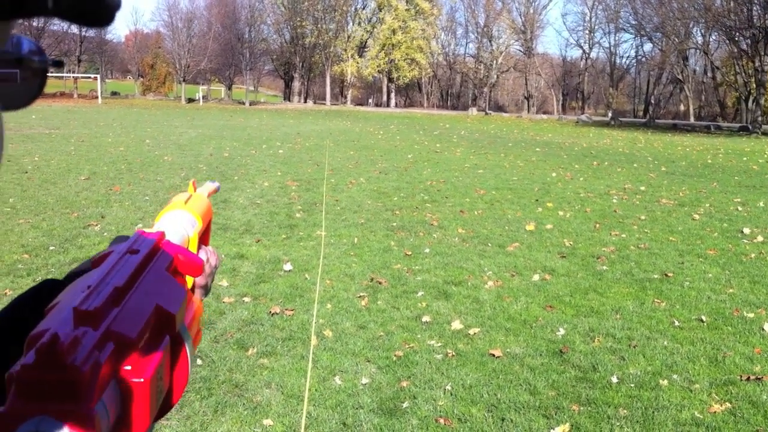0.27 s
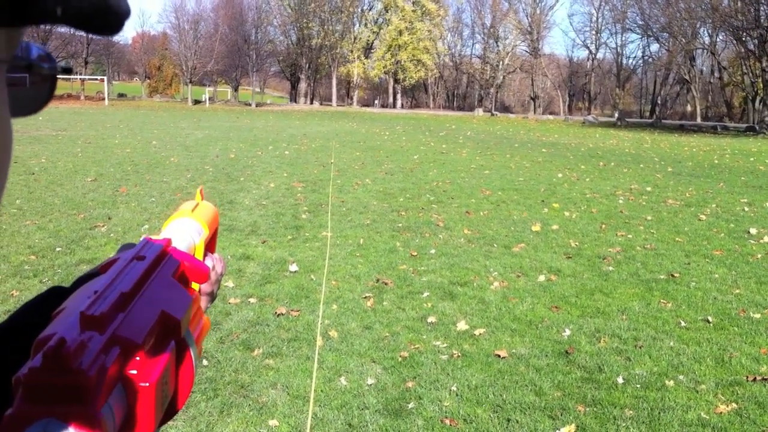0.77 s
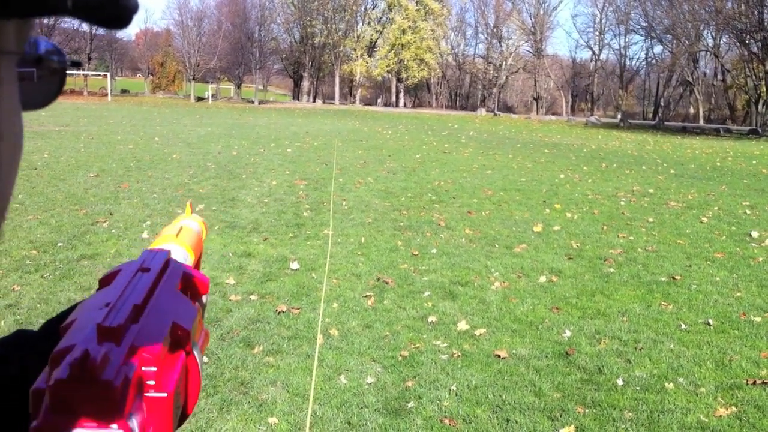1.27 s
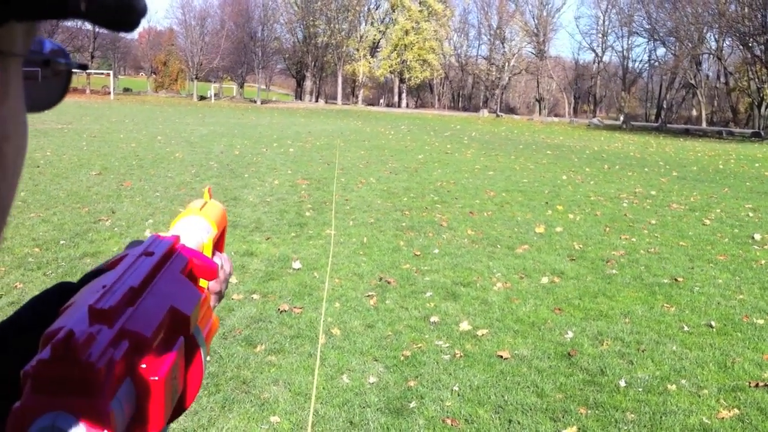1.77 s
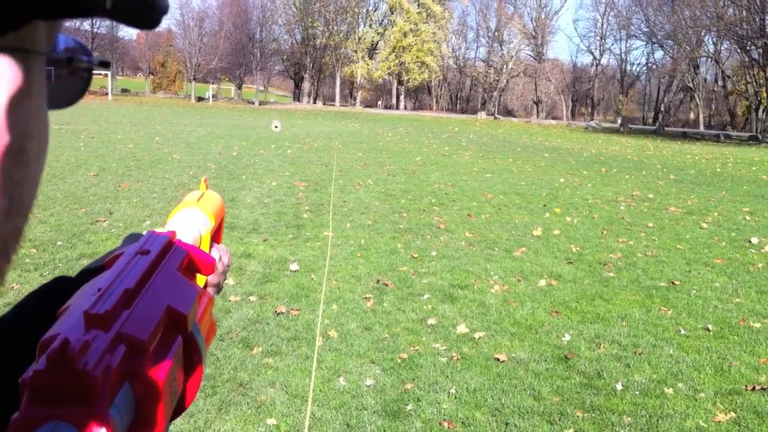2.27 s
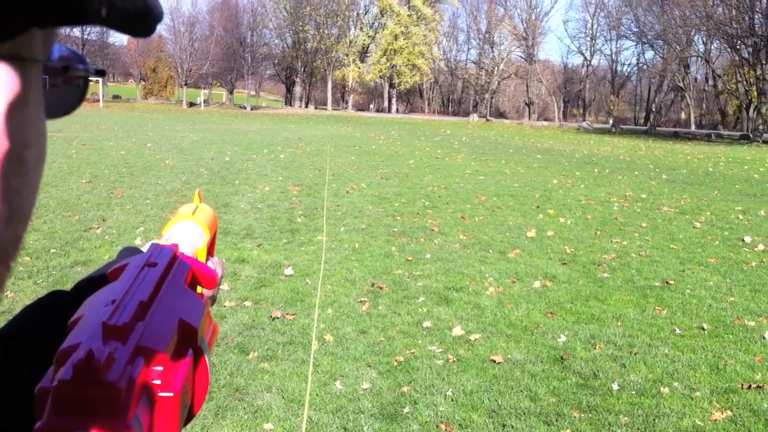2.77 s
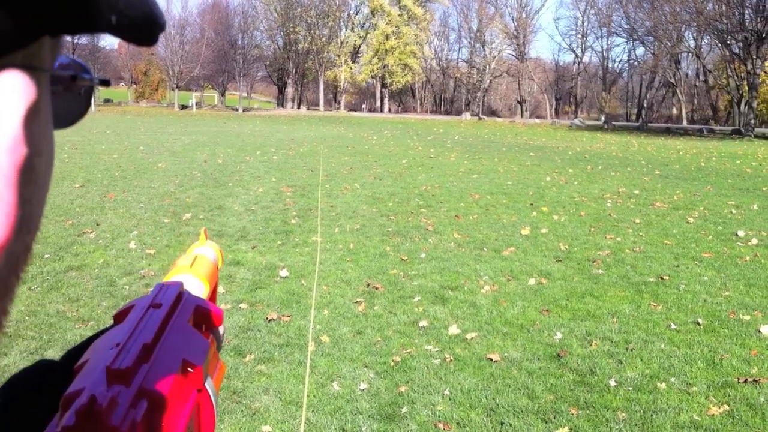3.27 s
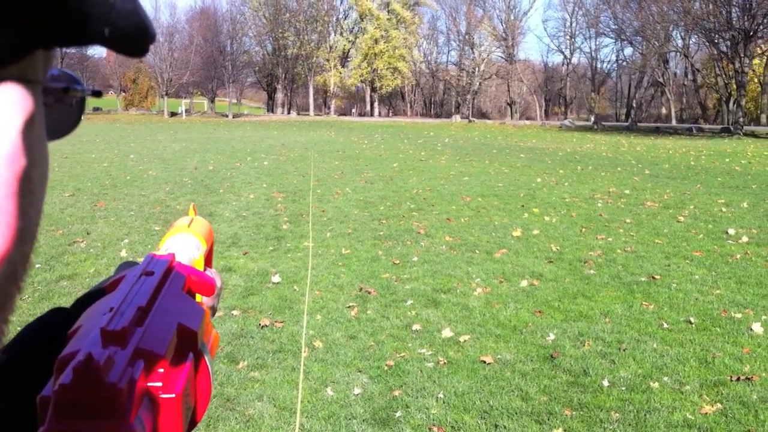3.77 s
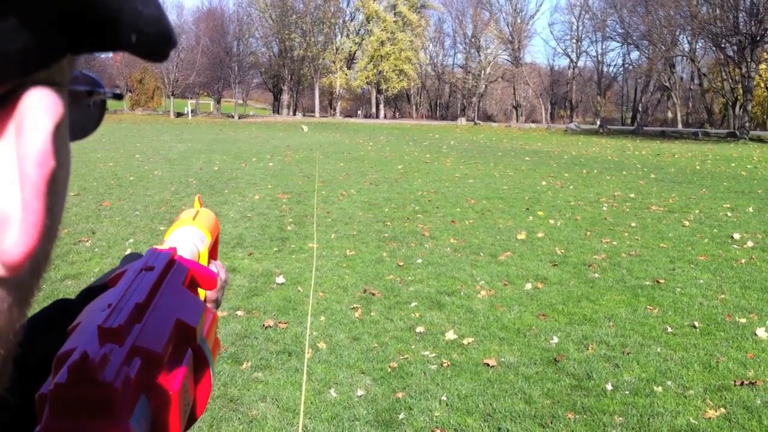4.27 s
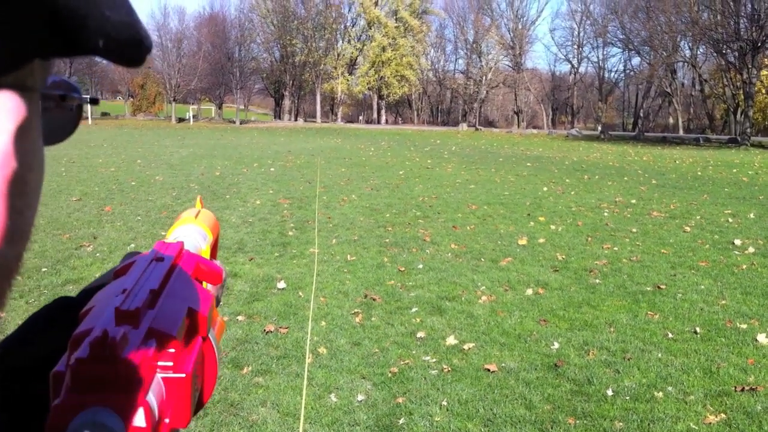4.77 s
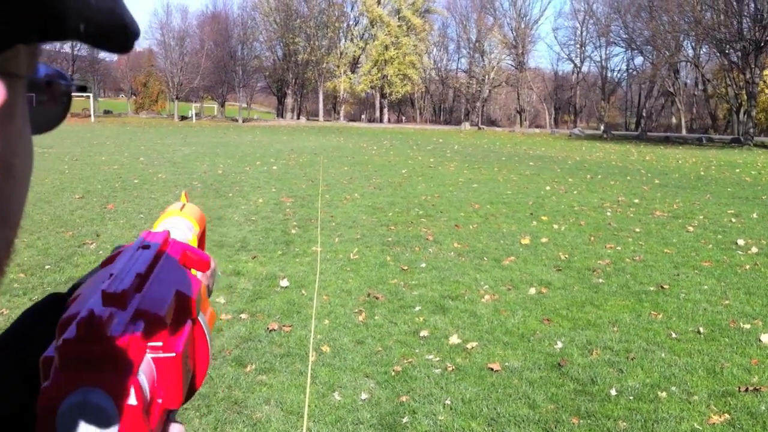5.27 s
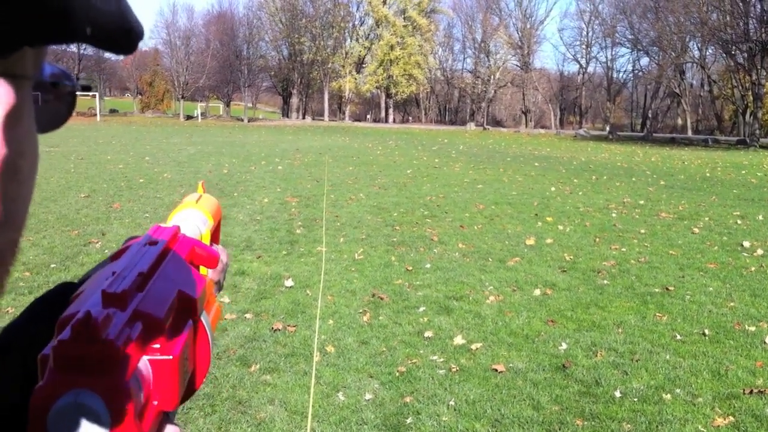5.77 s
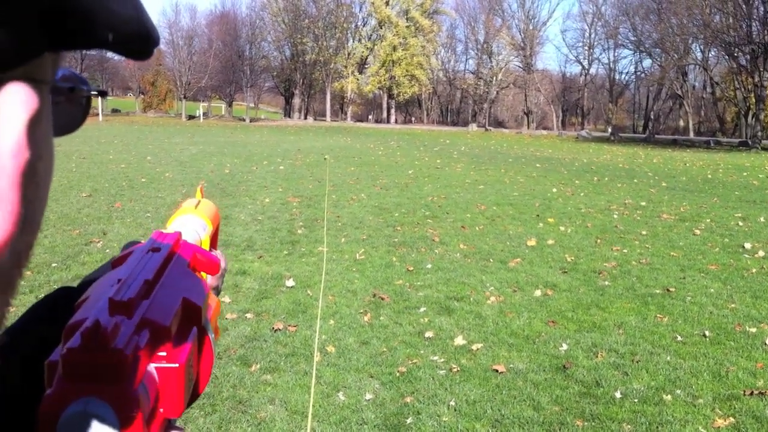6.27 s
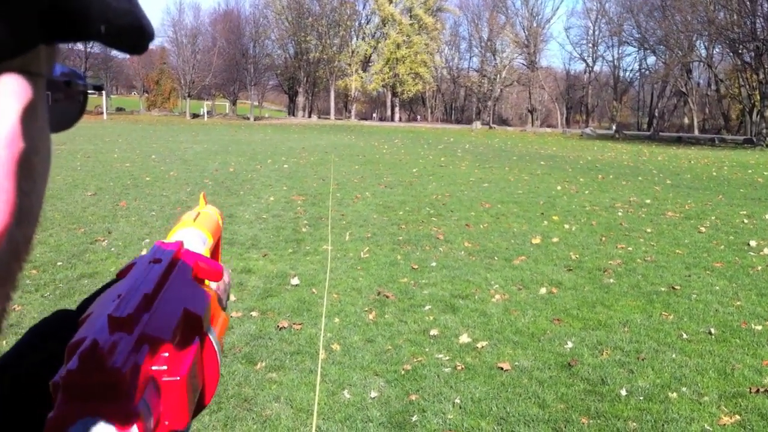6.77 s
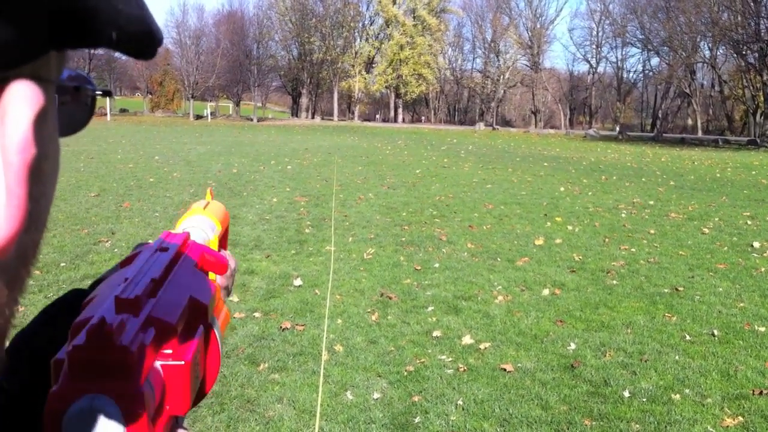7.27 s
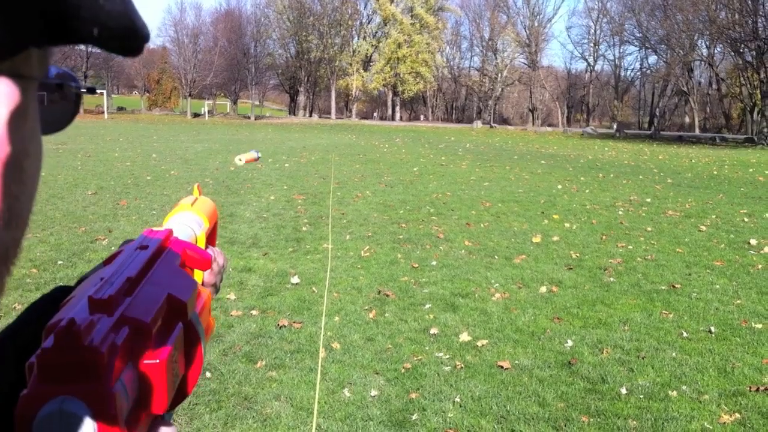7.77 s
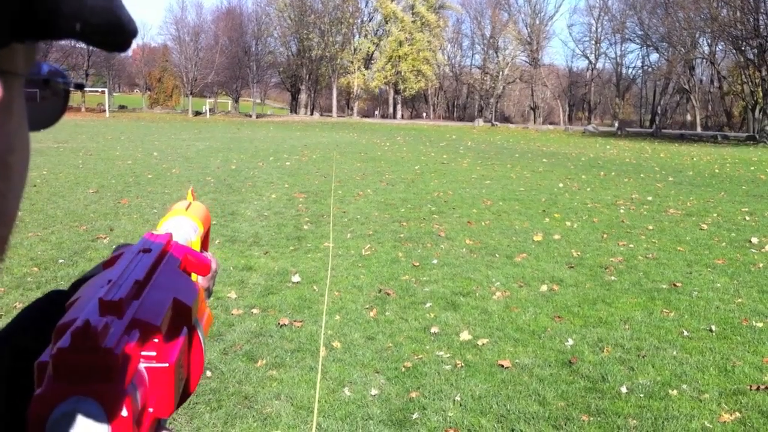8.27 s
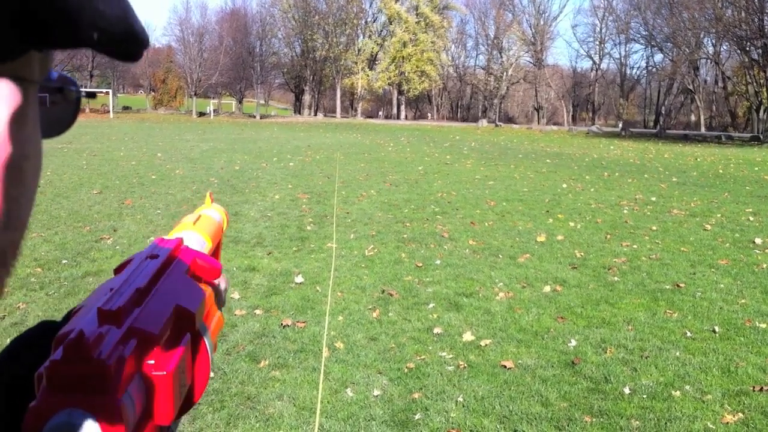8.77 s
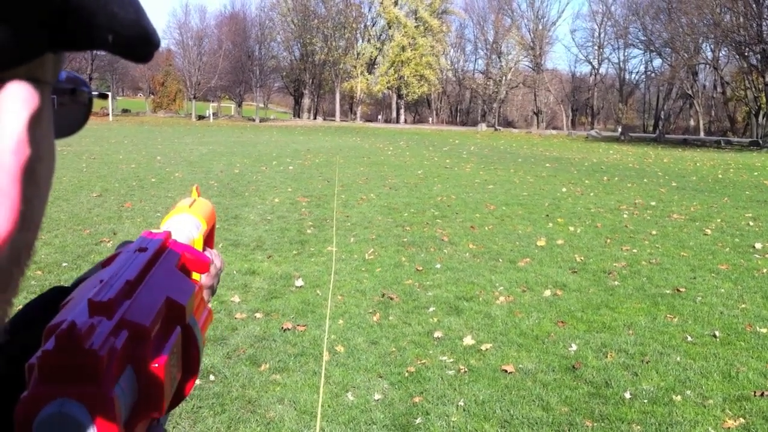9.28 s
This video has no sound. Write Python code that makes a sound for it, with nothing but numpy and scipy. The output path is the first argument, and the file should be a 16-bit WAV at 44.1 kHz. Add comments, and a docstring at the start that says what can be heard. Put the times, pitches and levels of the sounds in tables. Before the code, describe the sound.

Close, dry plastic mechanics outdoors, with almost no echo. A spring blaster fires with a sharp crack and brief airy whistle, its trigger clicks back, the pump is pulled through several rapid clicks to a stop, then pushed forward to a hollow clack with faint springy ringing. The cycle repeats evenly, five shots and five pumps, above a soft far-off road rumble and faint hiss.

```python
"""A low traffic hum and a few breeze puffs are heard first, then a plastic dart blaster is fired and pumped five times.
Each shot is a trigger creak, latch ticks and the plunger's slam; the dart whistles away. The trigger clicks back,
the pump grip ratchets back and slides home. Plastic is impact noise driving shell resonances, the spring rings as
decaying sines and a noisy mode cluster, the whistle is a gliding tone, and air, road and hiss are shaped noise."""
import sys
import numpy as np
from scipy import signal
from scipy.io import wavfile
from scipy.ndimage import map_coordinates

SR = 44100
rng = np.random.default_rng(int(sys.argv[2]) if len(sys.argv) > 2 else 0)


def store_wav(level_fs):
    """Save 16-bit WAV to argv[1]."""
    pcm = np.round(np.clip(np.atleast_2d(level_fs), -1, 1) * 32767)
    wavfile.write(sys.argv[1], SR, pcm.T.astype(np.int16))


N = 420273
TINY = 1e-18   # keeps idle filters away from denormal numbers


def amp(db):
    """Logarithmic level: decibels to a pressure gain."""
    return 10 ** (np.asarray(db) / 20)


def rms_one(x):
    """Normalisation: scale a signal to unit rms."""
    return x / np.sqrt(np.mean(x ** 2) + 1e-20)


def seconds(duration_s):
    """Sampling: the time axis of a short event, in seconds."""
    return np.arange(int(duration_s * SR)) / SR


def add_at(out, s, shape):
    """Superposition: add a short shape to a signal, starting at s seconds."""
    out[int(s * SR):][:shape.size] += shape


def drift(rate):
    """Slow random modulation: smoothly joined random values, rate of them per second; rms 1."""
    steps = rng.standard_normal(int(N / SR * rate) + 3)
    position = np.arange(N) / SR * rate + 1
    return rms_one(map_coordinates(steps, [position], order=3))


def resonate(x, hz, width_hz):
    """Damped resonance: a two-pole mode with gain close to 1 at its peak."""
    r = np.exp(-np.pi * width_hz / SR)
    poles = [1, -2 * r * np.cos(2 * np.pi * hz / SR), r * r]
    return signal.lfilter([(1 - r * r) / 2, 0, (r * r - 1) / 2], poles, x)


def body(x, modes, sway_db=0):
    """Modal superposition: parallel modes of alternating sign, scaled so that steady white noise keeps its rms."""
    click = np.eye(1, 4096)[0]   # put ahead of the sound to learn the energy of the response
    both = 0
    for k, (hz, width_hz, db) in enumerate(modes):
        drive = x * amp(sway_db * drift(40)) if sway_db else x
        both = both + (-1) ** k * amp(db) * resonate(np.r_[click, drive], hz, width_hz)
    return both[click.size:] / np.sqrt(np.sum(both[:click.size] ** 2))


def coloured(spectrum, patchy_db, rate):
    """Spectral shaping: third-octave bands of noise, each flickering on its own; rms 1."""
    hz, level_db = np.transpose(spectrum)
    out, white = 0, rng.standard_normal((2, N))
    octaves = np.log2(min(hz[-1], 17000) / hz[0])
    edges = hz[0] * 2 ** np.arange(0, octaves + .3, 1 / 3)
    for k, (low, high) in enumerate(zip(edges, edges[1:])):
        sos = signal.butter(2, [low, high], "band", fs=SR, output="sos")
        band = signal.sosfilt(sos, white[k % 2])   # neighbouring bands use different noise
        centre_db = np.interp(np.log(low * high) / 2, np.log(hz), level_db)
        out = out + band * amp(centre_db + patchy_db * drift(rate))
    return rms_one(out)


def swell(rows, column):
    """Amplitude envelope: one dB column of short curves as a gain that is zero between them."""
    gain = np.zeros(N)
    for curve in rows:
        s, value = np.transpose(curve)[[0, column]]
        i = np.arange(int(s[0] * SR), int(s[-1] * SR))
        gain[i] = amp(np.interp(i / SR, s, value)) * signal.windows.tukey(i.size, .1)
    return gain


# Spectrum of the microphone hiss. Each row: frequency in Hz, relative density in dB per Hz.
HISS_SPECTRUM = [(1500, -0.5), (4000, 0), (8000, -2.5), (13000, -4), (16000, -2)]


def microphone_hiss():
    """Self-noise: a steady broadband floor at -76 dB rms."""
    return amp(-76) * coloured(HISS_SPECTRUM, patchy_db=.4, rate=14)


# Far road. Each row: time in seconds, rumble in dB, tyre roar in dB, motor note in dB.
TRAFFIC_LEVELS = [(0.0, -48, -56.5, -75), (0.26, -52, -59, -70), (0.5, -55, -58, -65.5),
                  (1.33, -54.5, -58, -71.5), (2.12, -55, -59, -63.5), (2.76, -54.5, -58, -62.5),
                  (3.66, -54.5, -58, -67), (3.74, -55.5, -59, -62.5), (5.23, -57, -57.5, -66.5),
                  (5.57, -57, -59, -74.5), (6.02, -56.5, -58, -73), (6.74, -58, -59.5, -72),
                  (7.09, -57, -58.5, -82), (7.4, -58.5, -59, -75), (7.94, -56, -59.5, -71),
                  (8.09, -57.5, -58.5, -76), (9.0, -57, -57.5, -75.5), (9.53, -57, -58.5, -68)]
# Spectrum of the engine rumble. Each row: frequency in Hz, relative density in dB per Hz.
RUMBLE_SPECTRUM = [(25, -39), (60, -23), (100, -5), (140, -1), (212, 2), (300, -6), (360, -18.5),
                   (500, -27.5)]
# Spectrum of the tyre roar. Each row: frequency in Hz, relative density in dB per Hz.
ROAR_SPECTRUM = [(250, -10.5), (400, -1), (600, -0.5), (900, 2.5), (1300, -0.5), (1800, -7.5),
                 (2400, -16.5), (3500, -31.5), (5000, -42.5)]
MOTOR_HZ = 313.4   # middle of a wandering note


def traffic():
    """Incoherent sum of sources: engine rumble, tyre roar and one faint motor note from a far road."""
    s, *columns = np.transpose(TRAFFIC_LEVELS)
    rumble_db, roar_db, motor_db = [np.interp(np.arange(N) / SR, s, c) for c in columns]
    rumble = amp(rumble_db) * coloured(RUMBLE_SPECTRUM, patchy_db=1.5, rate=6.5)
    roar = amp(roar_db) * coloured(ROAR_SPECTRUM, patchy_db=-0.76, rate=4)
    phase = 2 * np.pi * np.cumsum(MOTOR_HZ + 2.5 * drift(4)) / SR
    motor = np.sqrt(2) * np.sin(phase) * amp(1.3 * drift(8))
    return rumble + roar + amp(motor_db) * motor


# Buffets of the breeze. Each row: start in seconds, strength in dB before the puff is shaped.
BREEZE_BUFFETS = [(0.009, -53), (0.036, -58), (0.109, -52), (0.189, -53), (0.269, -56), (1.096, -53)]


def breeze():
    """Turbulent pressure at the microphone: each buffet is a short low puff of noise."""
    force, t = np.zeros(N), seconds(.06)
    puff = np.sin(np.pi * t / t[-1]) ** 2 * amp(-300 * t)
    for s, db in BREEZE_BUFFETS:
        add_at(force, s, amp(db - 2.5) * puff)
    modes = [(125, 37, 4), (188.7, 240, 0.5), (300, 120, -17)]   # (Hz, width Hz, dB)
    return body(force * rng.standard_normal(N) + TINY, modes)


ECHO_DB, ECHO_T60_S = -33, 0.27


def lawn(x):
    """Diffuse scattering from grass, body and far trees: a faint dull tail."""
    t = seconds(.4)
    tail = rng.standard_normal(t.size) * amp(-60 * t / ECHO_T60_S) * np.minimum(t / .01, 1)
    tail = signal.lfilter([1], [1, -.8], tail)   # dulls the treble
    return amp(ECHO_DB) * signal.fftconvolve(x, tail / np.sqrt(np.sum(tail ** 2)))[:N]


# Darts in flight. Each row: start in seconds, pitch in Hz, fall in Hz per second (negative rises),
# level in dB, hold in seconds.
DART_WHISTLES = [(.39, 2240, -150, -62, .07), (2.345, 2330, 1200, -63, .04), (4.25, 2300, 800, -56, .01),
                 (6.03, 2220, 400, -67, .04), (7.875, 2150, 250, -66, .12)]
# Air rush round the first dart. Each row of its curve: time in seconds, level in dB.
FIRST_DART_RUSH = [
    [(.395, -66), (.45, -70), (.54, -79)],
]
WHISTLE_FADE_DB_PER_S, WHISTLE_TAIL_S = 110, .14


def darts():
    """Hole tone: air over the hole in the tip blows a wavering note that holds, then fades as the dart leaves."""
    flights = []
    for s, hz, fall, db, hold_s in DART_WHISTLES:
        times = (0, hold_s, hold_s + WHISTLE_TAIL_S)
        flights.append([(s + t, hz - fall * t, db - WHISTLE_FADE_DB_PER_S * max(t - hold_s, 0)) for t in times])
    s, hz, _ = np.transpose(sum(flights, []))
    pitch_hz = np.interp(np.arange(N) / SR, s, hz) * (1 + .003 * drift(72))
    phase = 2 * np.pi * np.cumsum(pitch_hz) / SR
    whistle = swell(flights, column=2) * amp(2.5 * drift(70)) * np.sqrt(2) * np.sin(phase)
    air = swell(FIRST_DART_RUSH, column=1) * rng.standard_normal(N)
    return whistle + body(air + TINY, [(3800, 460, 0)])


# Hard stops that push the air and shake the coils. Each row: time in seconds, jolt in dB before its pulse
# shape, shimmer in dB, shimmer decay T60 in seconds.
STOPS = [(.385, -36, -68, .43), (1.329, -42, -86, .5), (1.67, -45.5, -84, .5), (2.336, -40, -80, .4),
         (3.273, -46.5, -76, .5), (3.581, -41, -68, .5), (4.234, -42, -77, .66), (5.103, -41.5, -70, .54),
         (5.385, -49, -72, .97), (6.006, -34.5, -77, .5), (6.936, -45, -73, .99), (7.249, -48, -70, .6),
         (7.855, -41, -84, .5), (8.719, -49, -65, .64), (8.998, -51, -71, .7)]


def jolts():
    """Impulsive displacement: a mass that stops short sends one low push of air."""
    out, t = np.zeros(N), seconds(.03)
    push = (t / .0012) * np.exp(1 - t / 0.00092)
    for s, db, *_ in STOPS:
        add_at(out, s, amp(db) * push)
    return signal.sosfilt(signal.butter(1, 40, "high", fs=SR, output="sos"), out)


# Pings of the main spring. Each row: start in seconds, pitch in Hz, level in dB before a flicker.
SPRING_PINGS = [(1.338, 4400, -72), (1.674, 2590, -68), (3.28, 3050, -71), (3.28, 4380, -75),
                (5.106, 3830, -73), (6.944, 4330, -73)]
# Dense high coil modes. Each row: frequency in Hz, width in Hz, relative level in dB.
COIL_MODES = [(11300, 300, -7), (11740, 180, 0), (12400, 350, -6)]
PING_T60_S = 0.5


def spring():
    """Free vibration: the coil pings on single modes and, after hard stops, shimmers on a high cluster."""
    pings, shake, t = np.zeros(N), np.full(N, TINY), seconds(.5)
    for s, hz, db in SPRING_PINGS:
        add_at(pings, s, amp(db - 60 * t / PING_T60_S) * np.sin(2 * np.pi * hz * t))
    for s, _, db, t60 in STOPS:
        add_at(shake, s, amp(db - 60 * t / t60))
    shimmer = body(shake * rng.standard_normal(N), COIL_MODES)
    return pings * amp(3.2 * drift(150)) + shimmer


# Plastic contacts by kind. Each row: time of the peak in seconds, level in dB before its colour,
# brightness in dB per register above the clack.
CONTACT_TIMES = { "brush": [(.333, -47, 0), (.3513, -49, -1), (.669, -54, -2), (.6916, -60, 0),
                 (1.2342, -57, 0), (1.26, -54, -1), (1.5825, -57, -3), (1.5888, -59, 0), (2.314, -56, 0),
                 (2.3982, -58, 0), (2.679, -58, 1), (3.1969, -59, -4), (3.2096, -52, 1), (3.4664, -58, -5),
                 (4.1941, -52, 1), (4.5503, -50, -6), (5.03, -57, -3), (5.0473, -52, -1), (1.5178, -64, 0),
                 (3.45, -61, 0), (3.494, -62, 0), (5.271, -63, 1), (5.295, -56, 0), (5.311, -63, 0),
                 (7.1294, -64, 0), (5.9655, -56, 1), (6.334, -62, -3), (6.4908, -54, -11), (6.86, -58, -4),
                 (7.1595, -59, 0), (7.8174, -49, 3), (8.187, -58, -1), (8.307, -60, 0)],
                 "tick": [(1.18, -62, 0), (2.3852, -58, 0), (3.131, -59, 0), (6.235, -63, 0),
                 (6.7735, -60, 0), (8.8746, -61, 0)], "creak": [(.3398, -39, -1), (2.3038, -43, 1),
                 (4.2051, -39, 1), (5.9767, -46, 0), (7.8262, -37, -1)], "latch": [(.364, -39, 0),
                 (2.3216, -38, 0), (4.2215, -37, 0), (5.9953, -39, 0), (7.8448, -38, 1)],
                 "release": [(.3784, -24, 1), (2.3357, -21, 0), (4.2362, -21, 0), (6.0082, -21, 0),
                 (7.858, -22, 0)], "slam": [(.3864, -20, -3), (2.3439, -26, 1), (4.2442, -26, 1.5),
                 (6.0176, -26, 0), (7.8677, -27, 0)], "rebound": [(.3967, -44, -1), (.4088, -56, -2),
                 (1.6914, -51, 0), (2.3659, -60, 2), (3.2916, -48, 0), (4.2654, -57, 2), (5.124, -54, 0),
                 (5.4022, -52, 0), (6.03, -48, 0), (6.956, -51, 0), (7.8783, -40, -1), (7.8872, -52, -2),
                 (8.7335, -54, 0)], "let_go": [(.68, -42, -1), (2.6987, -38, 0), (4.5626, -38, 0),
                 (6.3565, -37, 0), (8.2033, -38, 0)], "reset": [(.7077, -46, 0), (2.7278, -42, 0),
                 (4.5929, -42, 0), (6.387, -46, 0), (8.2372, -48, -4)], "rest": [(.772, -39, -1),
                 (2.7905, -36, -1), (4.6532, -40, 0), (6.439, -40, 0), (8.2937, -38, 0)],
                 "settle": [(.7901, -50, 0), (.7938, -50, -1), (2.8064, -46, 2), (4.6732, -47, 0),
                 (6.4628, -47, 0), (8.318, -47, 0)], "grip": [(1.2775, -48, 0), (1.29, -40, -2),
                 (3.223, -44, 0), (5.0567, -46, 0), (5.0614, -47, 0), (6.8925, -43, -2), (8.6638, -49, 0),
                 (8.6736, -45, 1)], "pawl": [(1.294, -43, 3), (3.236, -34, 0), (5.0734, -35, 0),
                 (6.9078, -37, 0), (8.6863, -34, 0)], "tooth": [(1.3092, -38, -4), (3.2522, -36, 0),
                 (5.087, -35, 1), (6.922, -38, 0), (8.7011, -38, 0)], "cock": [(1.3196, -30, 0),
                 (3.2622, -29, 0), (5.094, -27, 0), (6.93, -30, 0), (8.709, -27, -1)],
                 "stop": [(1.3313, -32, -1), (3.274, -35, 0), (5.1027, -31, 0), (6.9393, -32, -1),
                 (8.7172, -33, 1)], "bounce": [(1.3371, -35, 1), (1.6758, -38, 1), (3.2788, -42, -2),
                 (3.5869, -38, 2), (5.1062, -36, -1), (6.9445, -41, 0), (8.7208, -35, 0)],
                 "near": [(3.565, -48, -1), (5.366, -48, 0), (7.2324, -48, 2), (8.9098, -49, -2),
                 (8.981, -50, 0)], "touch": [(1.6664, -33, 1), (3.5789, -30, 0), (5.3812, -31, 0),
                 (7.2463, -35, -1), (8.9955, -31, 2.5)], "home": [(1.6701, -27, 0), (3.5818, -28, 0),
                 (5.3844, -28, 0), (7.2502, -28.5, 0), (8.9989, -30, 1)]}
# Colour of each kind of contact. Each row: thud, knock, clack, snap and tick in dB, rise in seconds,
# chatter T60 in seconds before each register stretches it.
CONTACT_COLOURS = {"brush": (-16, -14, -3, -1, 0, .0016, .024), "tick": (-11, -10, -10, -23, 0, .0017, .02),
                   "creak": (-25, -16, -2, 0, -4, .0023, .028), "latch": (-24, -25, -2, -7, 0, .0015, .016),
                   "release": (-21, -16, 0, -5.5, -3, .0027, .032),
                   "slam": (-16, -7, 0, -4.5, -3, .0025, .014), "rebound": (-14, -5, 0, -6, -6, .0016, .02),
                   "let_go": (-30, -26, -8, 0, -4, .0018, .024),
                   "reset": (-20, -21, 0, -2, -5, .0016, .036), "rest": (-20, -7, -5, -7, -1, .002, .037),
                   "settle": (-10, 1, -6, -12, -19, .002, .03), "grip": (-13, 0, -1, -3, -7, .0017, .026),
                   "pawl": (-24, -8, -4, -6, 0, .0017, .025), "tooth": (-11, -3, 0, -9, -8, .003, .025),
                   "cock": (-13, -15, -11, -6, 0, .0025, .029), "stop": (-2, -4, 0, -4, -3, .003, .018),
                   "bounce": (-1, -4, 0, 0, -3, .0013, .02), "near": (-20, -10, -9, -3, 0, .0016, .022),
                   "touch": (-16, -5, -17, -14, -1, .0012, .02), "home": (-21, -4.5, 0, -5, -3, .0018, .03)}
# How far the single blow stands out of the chatter. Each entry: kind, dB; 0 for kinds not named.
BLOW_CRISPNESS = {"slam": 3, "cock": 3, "pawl": 3, "home": 2, "touch": 2, "stop": -1, "release": -1,
                  "let_go": 4, "rest": 2, "tooth": 1}
# Faint random contacts before the grip is home.
JIGGLE_DB, JIGGLE_SPREAD_DB, JIGGLE_FROM_S, JIGGLE_SPAN_S = -69, 3, .14, .08


def contacts():
    """Impact sequence: every contact as (s, dB per register, rise s, t60 s, crispness dB)."""
    rows, step = [], np.array([0, 0, 0, 1, 2])
    for kind, hits in CONTACT_TIMES.items():
        *colour_db, rise_s, t60 = CONTACT_COLOURS[kind]
        for s, db, bright_db in hits:
            levels_db = db + np.array(colour_db) + bright_db * step
            rows.append((s, levels_db, rise_s, t60, BLOW_CRISPNESS.get(kind, 0)))
    rise_s, t60 = CONTACT_COLOURS["brush"][-2:]
    for s, *_ in CONTACT_TIMES["home"] * 2:   # loose parts jiggle twice while the grip slides home
        when = s - JIGGLE_FROM_S + JIGGLE_SPAN_S * rng.random()
        rows.append((when, rng.normal(JIGGLE_DB, JIGGLE_SPREAD_DB, step.size), rise_s, t60, 0))
    return rows


def stroke(stop, rub, effort_db=0):
    """Sliding contact: the same rubbing curve surrounds every contact of one kind."""
    curves = [[(end + s, db + effort_db) for s, db in rub] for end, *_ in CONTACT_TIMES[stop]]
    return swell(curves, column=1)


# Pump grip pulled along its rails. Each row: seconds from the stop, rub in dB.
GRIP_PULL = [(-.09, -69), (-.07, -62.5), (-.05, -54), (-.02, -49.5), (.005, -45)]
# Pump grip pushed home. Each row: seconds from the stop, rub in dB.
GRIP_PUSH = [(-.11, -69.5), (-.06, -75.5), (-.045, -60), (-.025, -53), (-.012, -50), (.002, -37.5)]
# Trigger dragging its latch. Each row: seconds from the contact, rub in dB.
TRIGGER_DRAG = [(-.016, -60), (-.008, -56.5), (.004, -55)]


def rubbing():
    """Stick-slip friction: a flickering drive while the grip slides and the trigger drags."""
    rub = stroke("stop", GRIP_PULL) + stroke("home", GRIP_PUSH) + stroke("creak", TRIGGER_DRAG)
    rub = rub + stroke("let_go", TRIGGER_DRAG, effort_db=-7)   # softer on the way back
    return rub * amp(1.6 * drift(250))


def grit(rough_db):
    """Random impact train: dense micro-impacts of uneven size; rms 1."""
    size_db = rough_db * np.minimum(rng.exponential(1, N), 4)
    return rms_one(rng.standard_normal(N) * amp(size_db))


# Modes of the shell in five registers, low to high.
# Each row: frequency in Hz, width in Hz, relative level in dB.
SHELL_THUD = [(250, 180, -2), (403.5, 130, 2.5)]
SHELL_KNOCK = [(631, 100, 0.43), (760, 120, 0.51), (937, 430, -5.3)]
SHELL_CLACK = [(1239.5, 100, 1.5), (1716, 210, 0.79), (2200, 400, -2)]
SHELL_SNAP = [(2850, 420, 2), (3530, 750, -1), (4450, 1100, -2), (5620, 1000, -13)]
SHELL_TICK = [(6960, 900, -1.5), (8550, 450, 2.5), (9740, 800, 0.5), (10940, 700, 3), (12500, 2100, 0.5),
              (14300, 600, 0.5), (14600, 1900, -5.5)]
MODE_SWAY_DB = 1.2   # each contact lands elsewhere and wakes the modes unevenly
RATTLE_T60_S = 0.1


def blaster():
    """Forced modal vibration: each contact's blow, chatter and faint settling rattle drive the shell."""
    out, t = 0, seconds(.15)
    rub, hits = rubbing(), contacts()
    impacts = grit(4.5)   # the same micro-impacts reach every register
    # (modes, t60 factor, rub dB, blow dB, rattle dB)
    registers = [(SHELL_THUD, 1.1, -12, 23, -26), (SHELL_KNOCK, 1.1, -7, 17, -26),
                 (SHELL_CLACK, 1.01, -2.5, 17, -25), (SHELL_SNAP, .95, -1.5, 12, -26),
                 (SHELL_TICK, .8, -4, 9, -36)]
    for k, (modes, stretch, rub_db, blow_db, rattle_db) in enumerate(registers):
        chatter, blows = rub * amp(rub_db), np.full(N, TINY)
        for s, levels_db, rise_s, t60, crisp_db in hits:
            after = t - 2 * rise_s   # time from the peak
            rattle = amp(rattle_db - 60 * after / RATTLE_T60_S)
            decay = amp(-60 * after / (t60 * stretch)) + rattle
            shape = np.where(after < 0, np.exp(-(after / rise_s) ** 2), decay)
            add_at(chatter, s - 2 * rise_s, amp(levels_db[k]) * shape)
            blows[int(s * SR)] += amp(levels_db[k] + blow_db + crisp_db)
        # small panels radiate little below their lowest mode
        radiate = signal.butter(2, 0.89 * modes[0][0], "high", fs=SR, output="sos")
        shell = body(chatter * impacts + blows, modes, MODE_SWAY_DB)
        out = out + signal.sosfilt(radiate, shell)
    return out


def scene():
    """Superposition: every source sums at one microphone."""
    toy = blaster()
    background = microphone_hiss() + traffic() + breeze()
    return (background + lawn(toy) + darts() + jolts() + spring() + toy)[None]


def record(dry):
    """Band limiting: the treble droops at the top and is then cut, 50 dB down from 16750 Hz."""
    soft = signal.sosfilt(signal.butter(8, 15800, fs=SR, output="sos"), dry)
    return signal.sosfilt(signal.cheby2(12, 50, 16750, fs=SR, output="sos"), soft)


dry = scene()
out = record(dry)
store_wav(out)
```